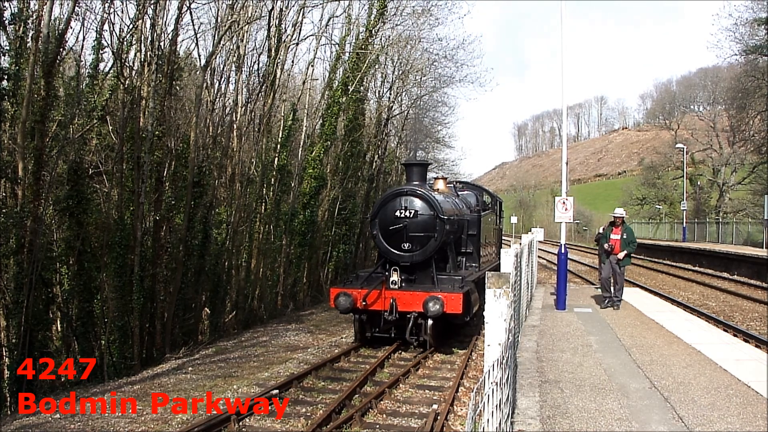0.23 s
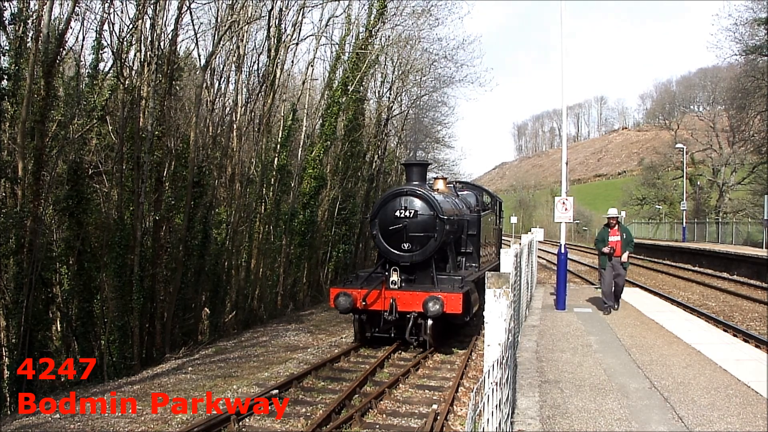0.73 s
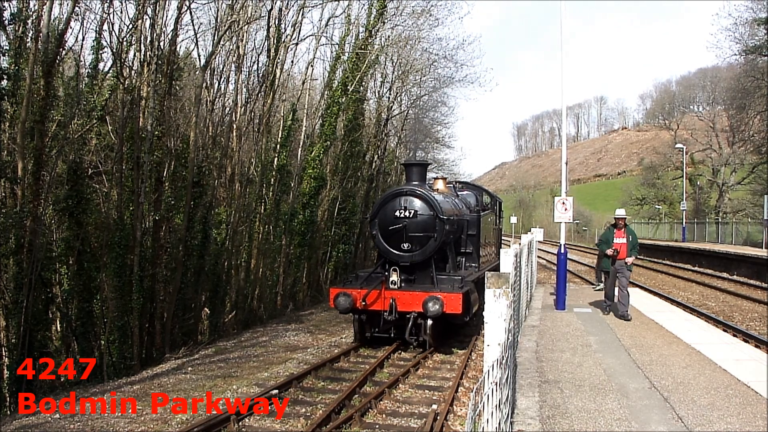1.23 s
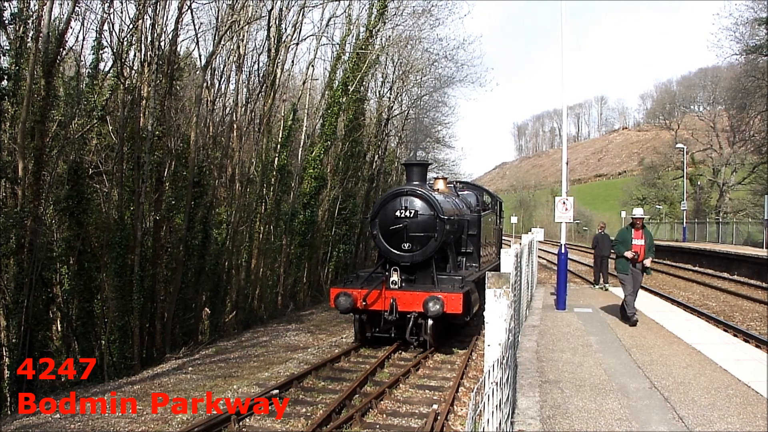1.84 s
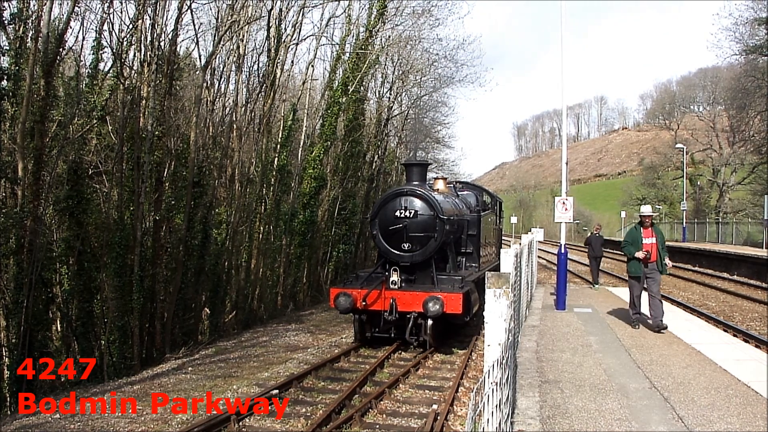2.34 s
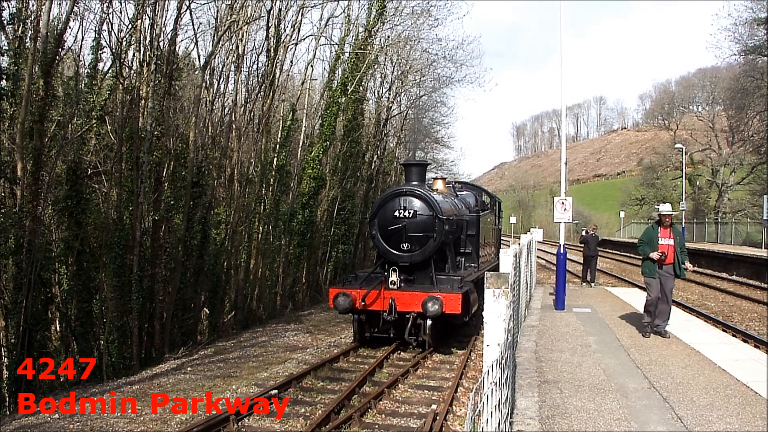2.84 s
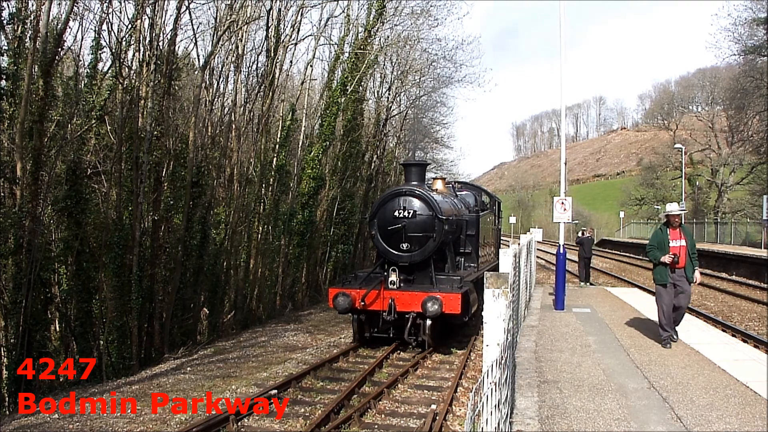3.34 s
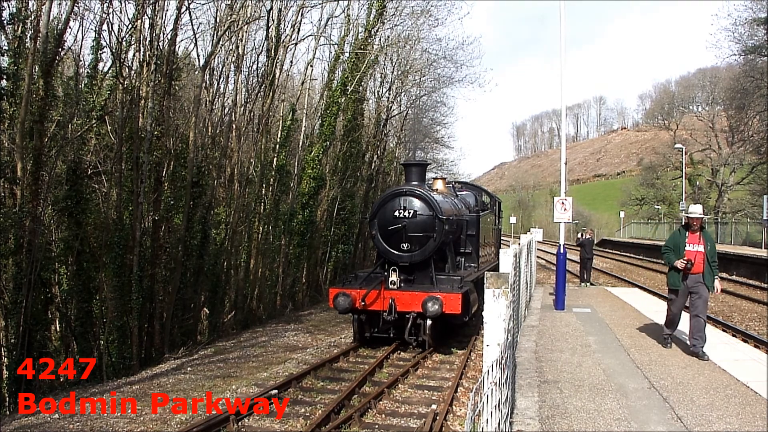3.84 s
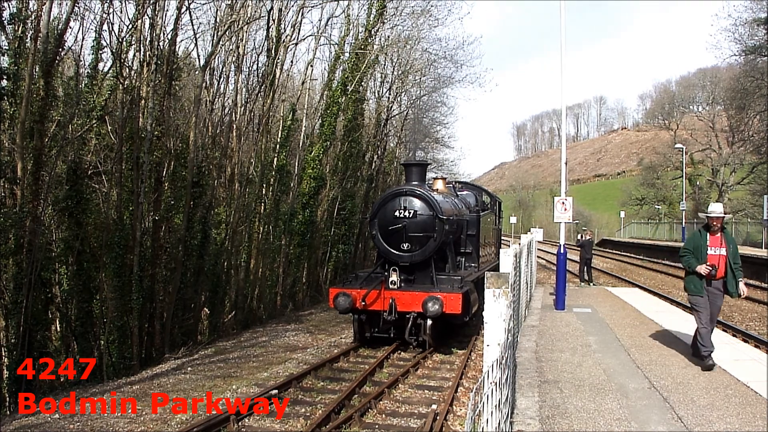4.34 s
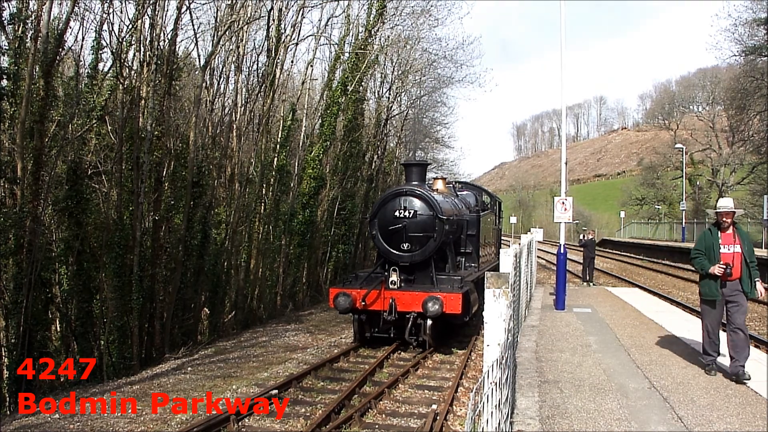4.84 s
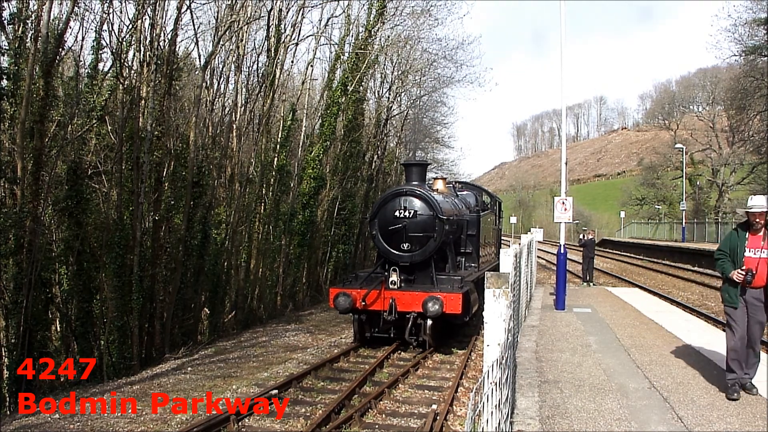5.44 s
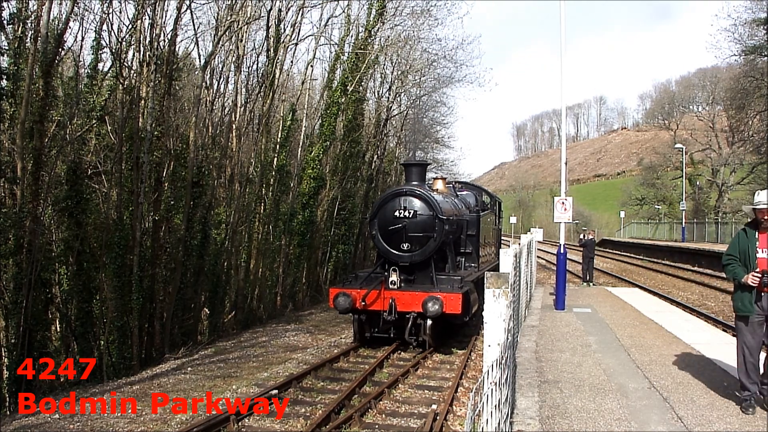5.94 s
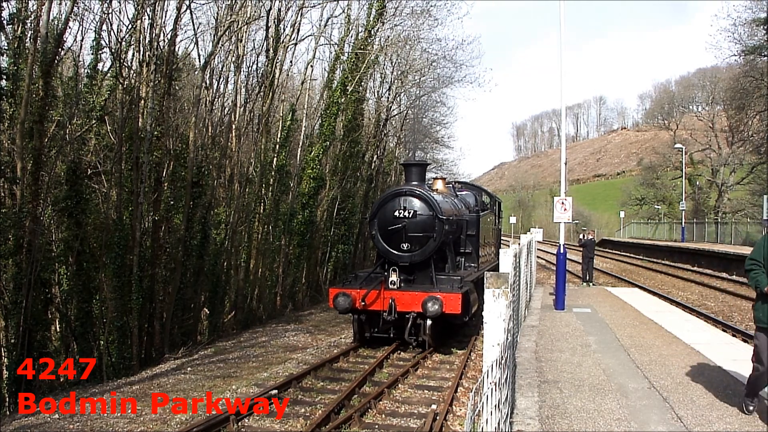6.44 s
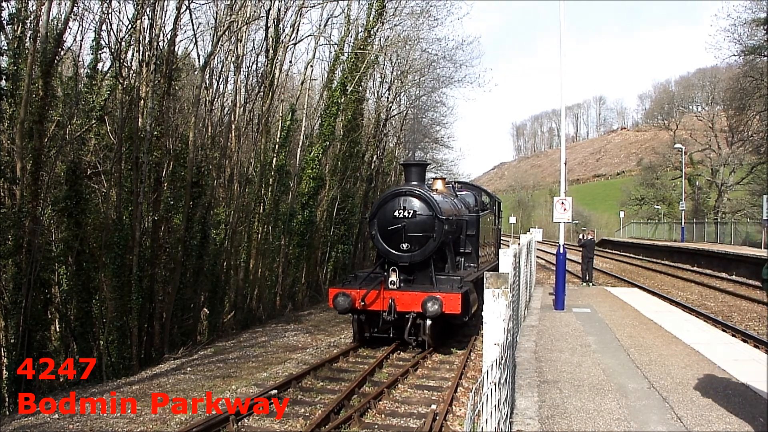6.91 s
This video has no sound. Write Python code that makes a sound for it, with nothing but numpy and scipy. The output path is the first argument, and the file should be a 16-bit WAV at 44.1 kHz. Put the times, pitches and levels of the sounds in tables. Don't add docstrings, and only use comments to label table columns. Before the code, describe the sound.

An outdoor country station heard from the platform through a small stereo camera microphone. From 0 s a diesel train on the next line is already close and leaving: a rough, mid-low exhaust and wheel roar with extra bass rumble in the first half second, throbbing about eleven times a second, and a hummed drone near 215 Hz that swells and dips. It is strongest around 1.3 s, dips slightly, then recedes smoothly from about 3 s, roughly ten decibels quieter by 7 s, its pitch sinking almost imperceptibly. Throughout, a standing steam locomotive releases a steady, airy, bright valve hiss with slight flicker and a faint hollow ringing, more noticeable as the diesel fades. Tiny high wheel squeaks near 6 kHz come at 3.05 to 3.55 s, then stronger from 6.7 s to the end at about 7.2 s, mixed with short soft bird chirps around 2.5 kHz.

```python
import sys
import numpy as np
from scipy import signal
from scipy.fft import rfft, irfft, next_fast_len
from scipy.io import wavfile
from scipy.ndimage import uniform_filter1d

SR = 44100
rng = np.random.default_rng(int(sys.argv[2]) if len(sys.argv) > 2 else 0)


def to_wav(sig):
    pcm = np.clip(np.atleast_2d(sig), -1, 1) * 32767
    pcm = np.round(pcm).astype(np.int16)
    wavfile.write(sys.argv[1], SR, pcm.T)


def boost(x):
    u = np.asarray(x, float) / 20
    return 10 ** u


N = 316197
TIME = np.arange(N) / SR


def colour(x, table):
    hz, db = np.transpose(table)
    size = next_fast_len(N)
    freqs = np.maximum(np.arange(size // 2 + 1) * SR / size, 1)
    gain = boost(np.interp(np.log(freqs), np.log(hz), db))
    return irfft(rfft(x, size) * gain, size)[..., :N]


def band(x, lo_hz, hi_hz):
    size = next_fast_len(N)
    octave = np.log2(np.maximum(np.arange(size // 2 + 1) * SR / size, 1))
    rise = np.clip(.5 + 4 * (octave - np.log2(lo_hz)), 0, 1)
    fall = np.clip(.5 + 4 * (octave - np.log2(hi_hz)), 0, 1)
    return irfft(rfft(x, size) * (rise - fall), size)[..., :N]


def walk(rate_hz):
    hold = int(SR / rate_hz)
    steps = np.repeat(rng.standard_normal(N // hold + 1), hold)
    return 1.61 * uniform_filter1d(uniform_filter1d(steps, hold), hold)[:N]


def bump(start_s, length_s):
    return np.sin(np.pi * np.clip((TIME - start_s) / length_s, 0, 1)) ** 2


def place(pair, lead_us):
    return np.array([pair[0], pair[1] + lead_us * 1e-6 / 2 * SR * np.gradient(pair[0])])


# (frequency [Hz], side minus mid [dB])
WIDTH = [(30, -12), (60, -20), (110, -23), (200, -23.5), (380, -25.5), (700, -18.5), (1290, -11.5),
         (2380, -10), (4400, -4.5), (8120, -4), (15000, -0.5)]


def widen(side):
    return colour(side, WIDTH)


# (time [s], rate [Hz])
CYCLE = [(0, 11.347), (1.5, 11.331), (2.8, 11.311), (4.5, 11.300), (6, 11.276), (7.2, 11.25)]


def engine_turn():
    thump_s = 3.262
    turn = 2 * np.pi * np.cumsum(np.interp(TIME, *np.transpose(CYCLE))) / SR
    return turn - turn[int(thump_s * SR)]


MAIN_ORDER = 19
# (multiple [1], level [dB])
ORDERS = [(5, -35), (6, -30), (7, -31), (8, -16), (9, -21), (10, -13), (11, -19), (12, -27), (13, -20),
          (14, -20), (15, -15), (16, -14), (17, -8), (18, -6), (19, -1), (20, -7), (21, -14), (23, -10),
          (24, -11), (26, -13), (28, -11), (29, -10), (32, -11), (40, -8), (45, -12), (46, -6), (54, -10),
          (56, -7), (60, -10), (61, -13)]


def exhaust_tones(turn):
    tones = 0
    for k, db in ORDERS:
        if k == MAIN_ORDER:
            continue
        start_rad = 2 * np.pi * rng.random() * (abs(k - MAIN_ORDER) > 3)
        level = boost(db + (.7 + k / 40) * walk(2.5))
        tones = tones + level * np.cos(k * turn + start_rad + .65 * walk(2.))
    return tones


# (frequency [Hz], density [dB per Hz])
ROAR = [(30, -43), (60, -45), (95, -16), (140, -18.5), (200, -7.5), (260, -3.5), (450, -1), (700, -5),
        (1000, -7.5), (1280, -7.5), (1600, -12.5), (1950, -13.5), (2500, -27.5), (6000, -70)]


def exhaust_roar(turn):
    noise = colour(rng.standard_normal((2, N)), ROAR)
    noise /= np.std(noise[0])
    return noise * (1 + 0.018 * np.cos(2 * turn) + 0.028 * np.cos(turn))


# (time [s], roar level [dB], drone over roar [dB])
DIESEL = [(0, -17, -5), (.6, -16, -5.5), (1.0, -15.5, -12.5), (1.35, -15, -5.5), (1.55, -17.5, -12.5),
          (1.8, -17, -8), (2.1, -16.5, -15.5), (2.35, -17.2, -8), (2.62, -17, -17), (2.9, -18, -9.5),
          (3.3, -18.5, -7), (4, -21.3, -6), (5, -22.5, -12), (6.2, -24.5, -5.5), (6.8, -25.5, -6.5),
          (7.17, -26.5, -13)]
# (time [s], left capsule lead [us])
DIESEL_LEAD = [(0, -9), (1.5, -23), (2.5, -38), (3.5, -16), (4.5, -9), (7.2, -7)]


def diesel():
    s, *columns = np.transpose(DIESEL)
    roar_db, drone_db = (np.interp(TIME, s, c) for c in columns)
    lost_db = -16 - roar_db
    abreast_db = 5.5 * np.exp(-TIME / 0.39)
    bass_db = -17.5 + .2 * lost_db + abreast_db
    upper_db = -7 + 0.22 * lost_db
    diffuse_db = -1 + 0.19 * lost_db

    turn = engine_turn()
    noise = exhaust_roar(turn)
    mid = noise[0] + boost(-7.5) * exhaust_tones(turn)
    pair = np.array([mid, boost(1.0 + diffuse_db) * widen(noise[1])])
    low, middle, upper = (band(pair, lo, hi) for lo, hi in ((1, 150), (150, 950), (950, 20000)))
    low /= np.std(low[0])
    middle /= np.std(middle[0])
    upper /= np.std(upper[0])

    drone = np.cos(MAIN_ORDER * turn + 0.2 * walk(3.1))
    middle[0] += boost(drone_db + 2.0 + 0.27 * walk(5.1)) * drone
    train = boost(bass_db - 0.8) * low + boost(1.18) * middle + boost(upper_db + 1.06) * upper
    return place(boost(roar_db) * train, np.interp(TIME, *np.transpose(DIESEL_LEAD)))


# (frequency [Hz], density [dB per Hz])
STEAM = [(1200, -8), (2400, 6.5), (2900, -5), (3300, -6.5), (3800, -8.5), (4500, -6), (5400, -1), (6000, 3),
         (6300, 1), (8500, 2), (10000, -6), (11200, -17.5), (14400, -22), (15700, -17.5)]


def steam():
    level_db, rise_db, rise_s, lead_us = -38, 1.5, .4, 7.
    jet = colour(rng.standard_normal((2, N)), STEAM)
    jet[1] = boost(-2.7) * widen(jet[1])
    jet /= np.std(band(jet[0], 5300, 10000))
    shared = walk(5.03)
    hiss = 0
    for hz in 800 * 2 ** np.arange(0, 4, .5):
        hiss = hiss + boost(0.34 * shared + 0.37 * walk(12.)) * band(jet, hz, hz * 2 ** .5)
    spit = boost(.3 * shared + 2.5 * walk(400.)) * band(jet, 14900, 20000)
    build = boost(level_db - rise_db * np.exp(-TIME / rise_s))
    return place(build * (hiss + spit), lead_us)


# (time [s], length [s], frequency [Hz], level [dB])
SQUEAKS = [
    (3.05, .08, 6030, -46),
    (3.30, .09, 6020, -44),
    (3.41, .06, 6040, -43),
    (3.52, .05, 6000, -47),
    (6.74, .07, 6020, -40),
    (6.80, .07, 6010, -43),
    (6.915, .065, 6020, -38),
    (6.93, .10, 5530, -43),
    (7.02, .05, 6000, -44),
    (7.07, .11, 5770, -42),
]


def squeaks():
    out = 0
    for s, length_s, hz, db in SQUEAKS:
        level = boost(db + 1.5 * walk(80.)) * np.sqrt(bump(s, length_s))
        out = out + level * np.sin(2 * np.pi * np.cumsum(hz + 25 * walk(80.)) / SR)
    return out * np.array([[1], [.5]])


# (time [s], length [s], start frequency [Hz], end frequency [Hz], level [dB])
CHIRPS = [
    (6.70, .04, 2350, 2420, -40),
    (6.88, .04, 2500, 2380, -41),
    (7.025, .06, 2630, 2570, -38),
    (7.07, .035, 2280, 2250, -40),
]


def bird():
    out = 0
    for s, length_s, start_hz, end_hz, db in CHIRPS:
        hz = np.interp(TIME, (s, s + length_s), (start_hz, end_hz))
        out = out + boost(db) * bump(s, length_s) * np.sin(2 * np.pi * np.cumsum(hz) / SR)
    return out * np.array([[1], [.8]])


# (frequency [Hz], width [Hz], level [dB])
RINGS = [(1940, 70, -50), (2320, 90, -55), (2680, 50, -63), (6010, 140, -60)]


def casing():
    out = 0
    for hz, width_hz, db in RINGS:
        ring = signal.lfilter(*signal.iirpeak(hz, hz / width_hz, SR), rng.standard_normal((2, N)))
        out = out + boost(db + 1.7 * walk(3.07)) * ring / np.std(ring[0]) * np.array([[1], [.4]])
    return out


# (frequency [Hz], left minus right [dB])
LEAN = [(60, -0.5), (110, 1), (200, 0.0), (380, 0.5), (700, -0.5), (1290, -0.5), (2380, -1.5), (4400, -1),
        (8120, -0.5), (15000, -1)]


def left_right(mid, side):
    half = np.array(LEAN) * [1, .5]
    return np.array([colour(mid + side, half), colour(mid - side, half * [1, -1])])


def scene():
    mid, side = diesel() + steam() + squeaks() + bird() + casing()
    return left_right(mid, side)


def duck():
    peak_s, depth_db, attack_s, release_s = 1.397, -2.5, 0.027, 0.36
    since_s = np.maximum(TIME - peak_s, 0)
    return boost(depth_db * (1 - np.exp(-since_s / attack_s)) * np.exp(-since_s / release_s))


# (frequency [Hz], gain [dB])
HOUSING = [(11000, 0), (11300, -2), (11600, -10), (11780, -40), (13600, -40), (13800, -8), (14100, 3),
           (14500, 5), (15700, 2)]


def housing(pair):
    return colour(pair, HOUSING)


NOTCH_HZ = (3010, 4004, 4994)


def notches(pair):
    for hz, width_hz in zip(NOTCH_HZ, (330., 280., 380.)):
        notch = signal.iirnotch(hz, hz / width_hz, SR)
        pair = signal.lfilter(*notch, signal.lfilter(*notch, pair))
    return pair


def band_limit(x):
    return signal.sosfilt(signal.butter(12, 15790, fs=SR, output="sos"), x)


def record(dry):
    rounded = np.tanh(.25 * dry) * 4
    mix = notches(housing(rounded * duck()))
    return band_limit(mix)


dry = scene()
out = record(dry)
to_wav(out)
```